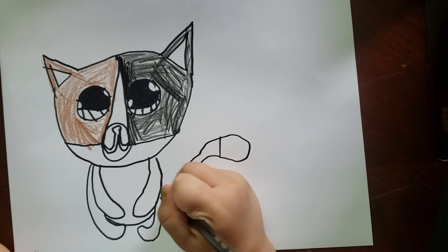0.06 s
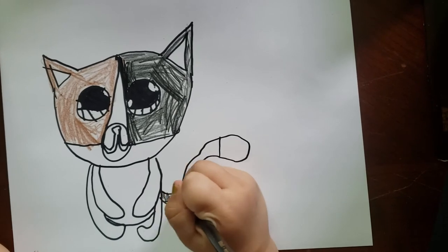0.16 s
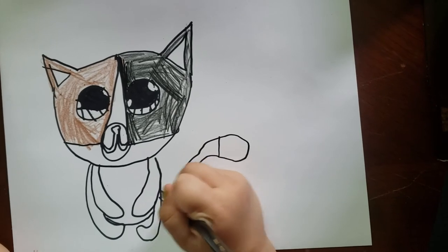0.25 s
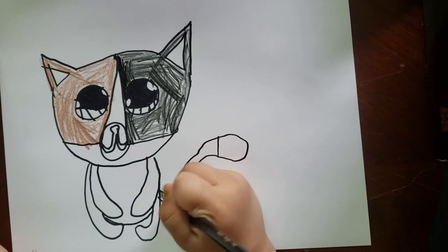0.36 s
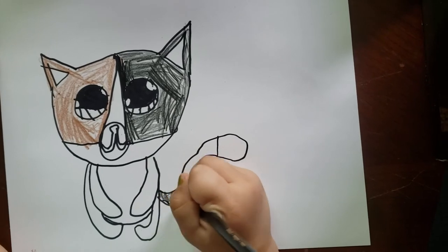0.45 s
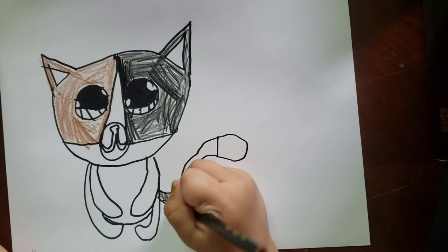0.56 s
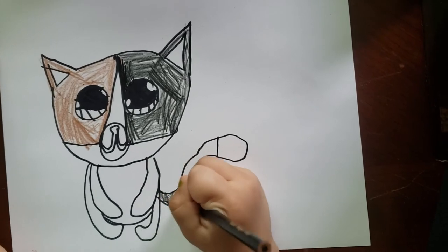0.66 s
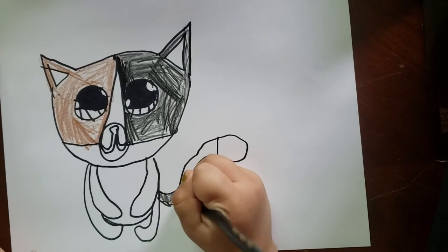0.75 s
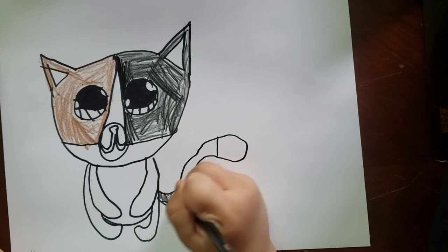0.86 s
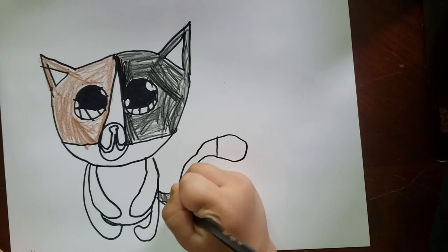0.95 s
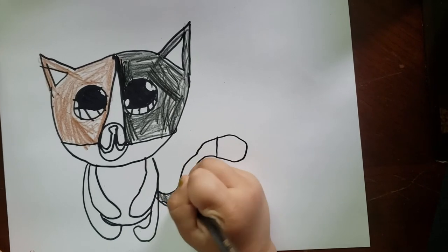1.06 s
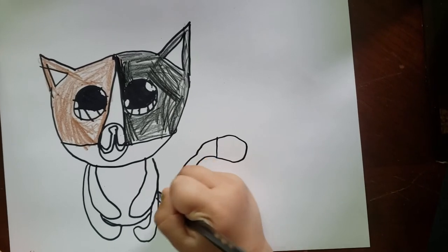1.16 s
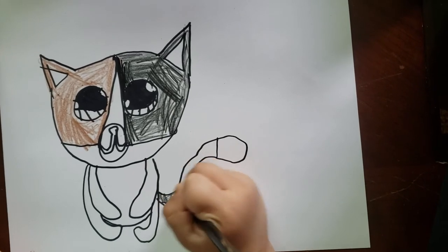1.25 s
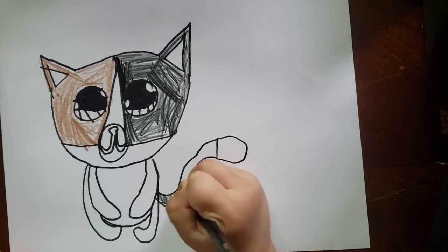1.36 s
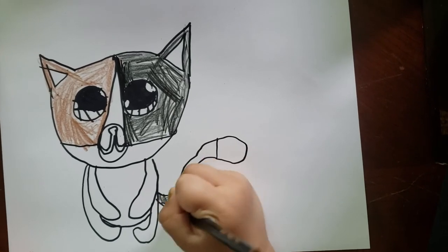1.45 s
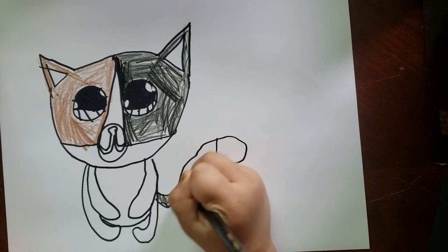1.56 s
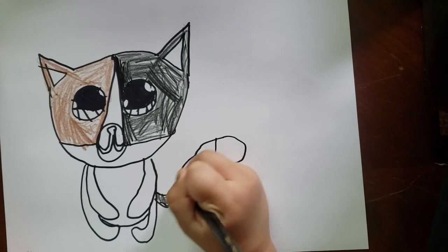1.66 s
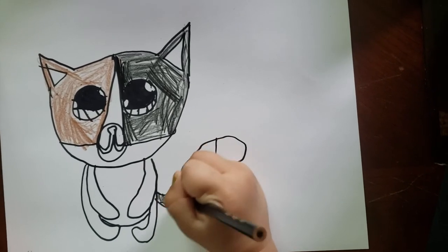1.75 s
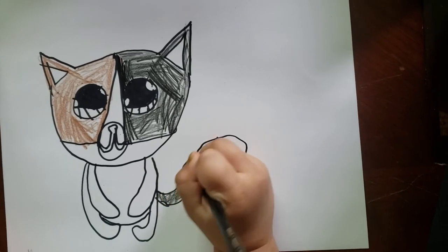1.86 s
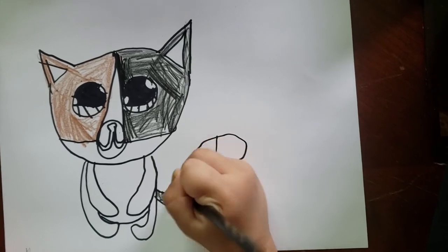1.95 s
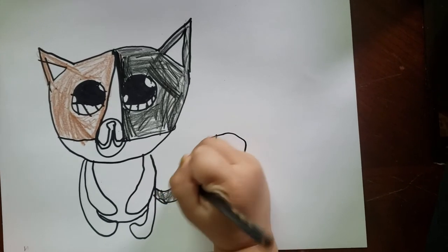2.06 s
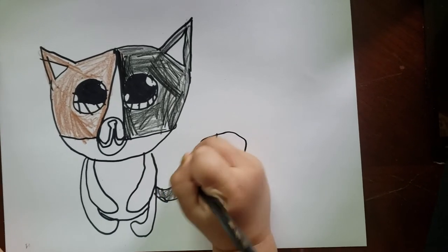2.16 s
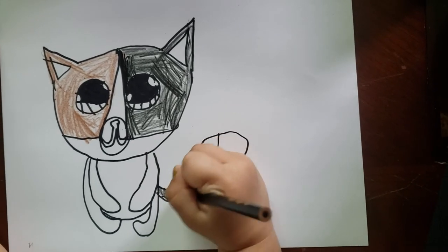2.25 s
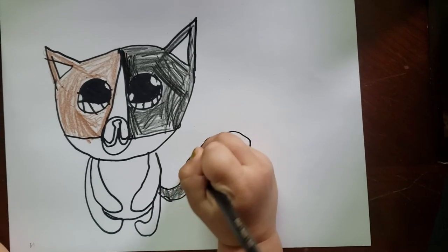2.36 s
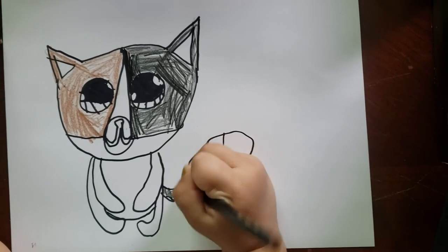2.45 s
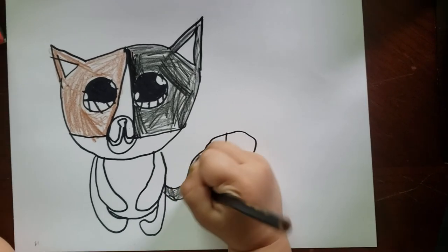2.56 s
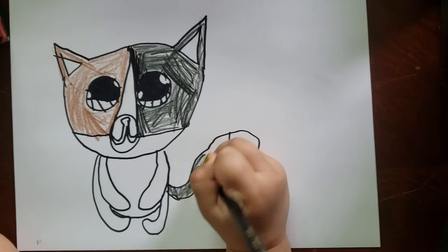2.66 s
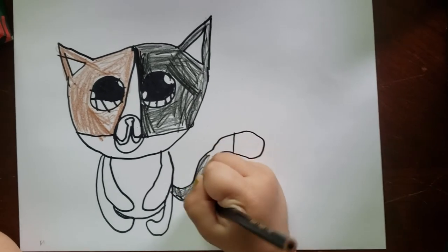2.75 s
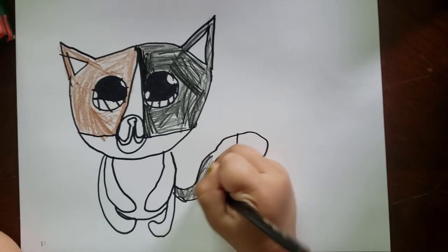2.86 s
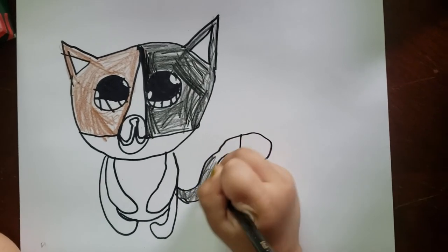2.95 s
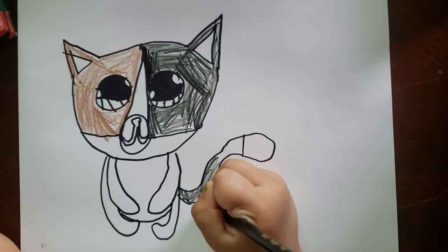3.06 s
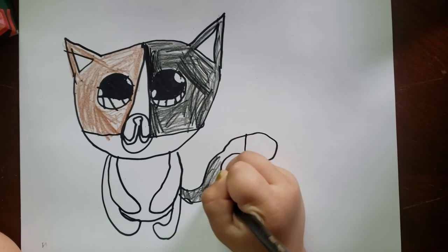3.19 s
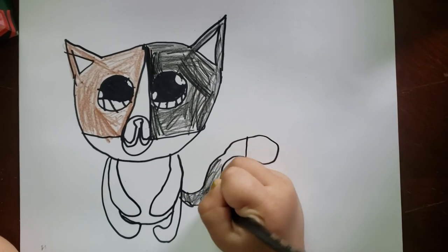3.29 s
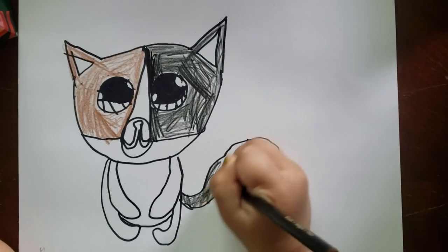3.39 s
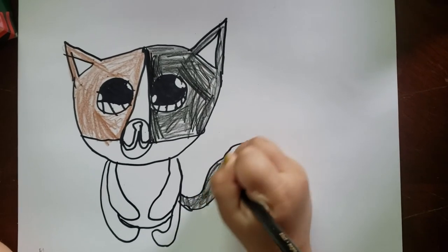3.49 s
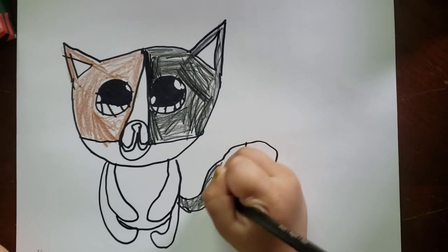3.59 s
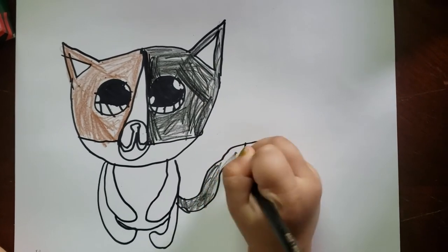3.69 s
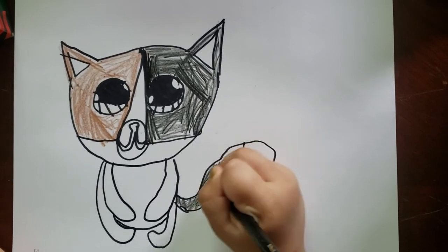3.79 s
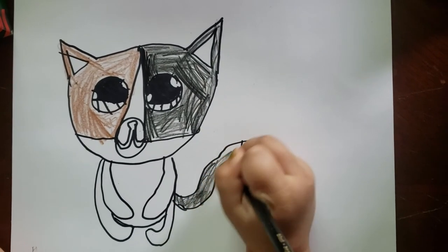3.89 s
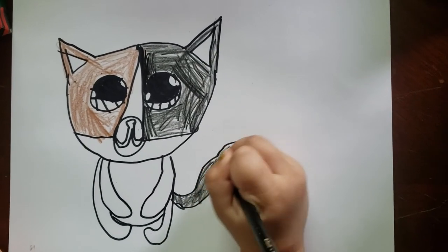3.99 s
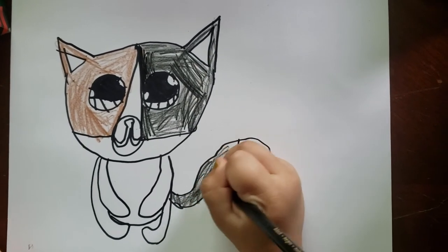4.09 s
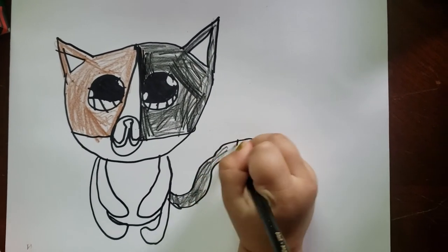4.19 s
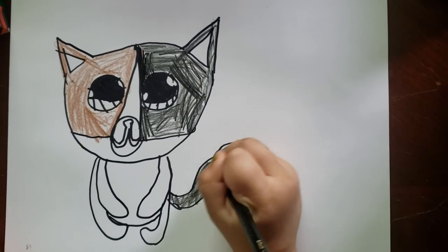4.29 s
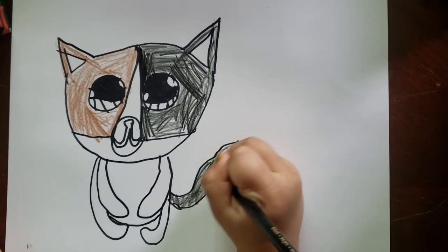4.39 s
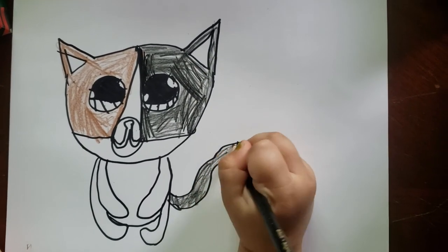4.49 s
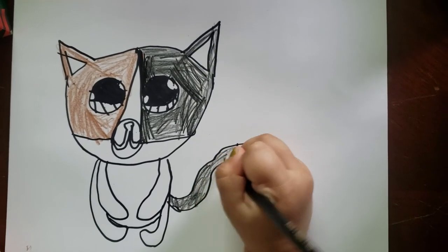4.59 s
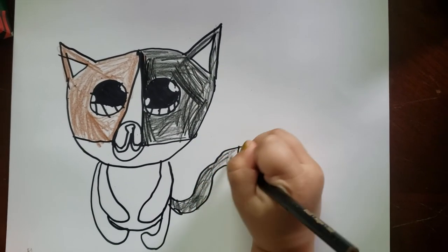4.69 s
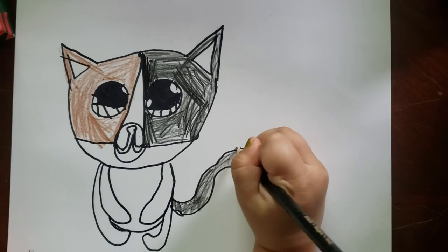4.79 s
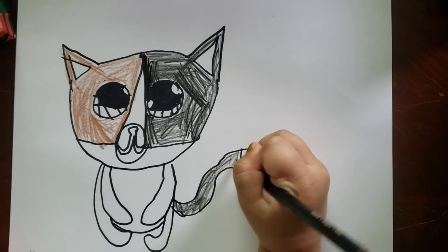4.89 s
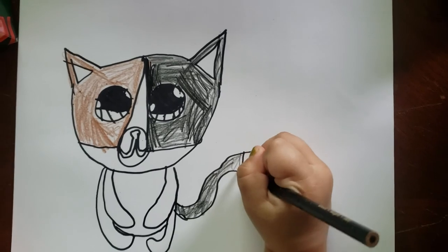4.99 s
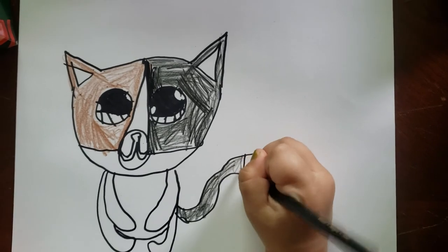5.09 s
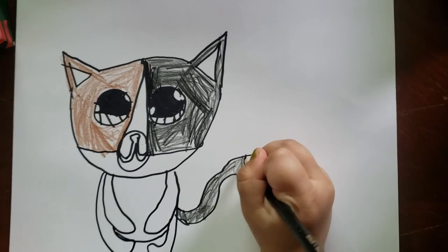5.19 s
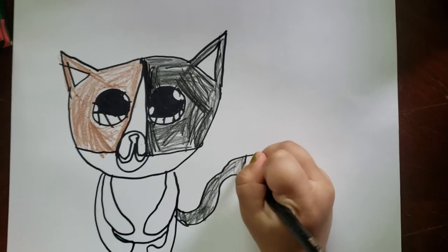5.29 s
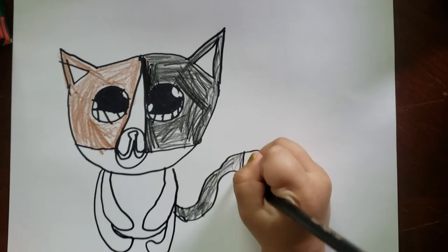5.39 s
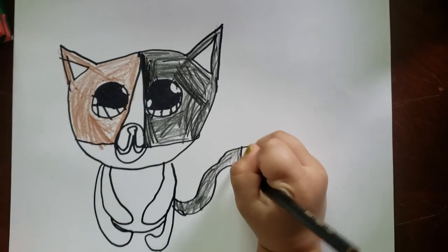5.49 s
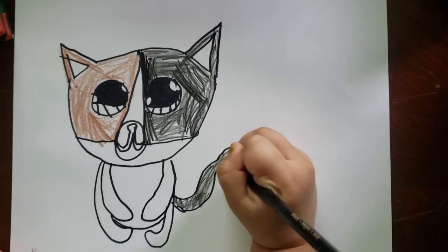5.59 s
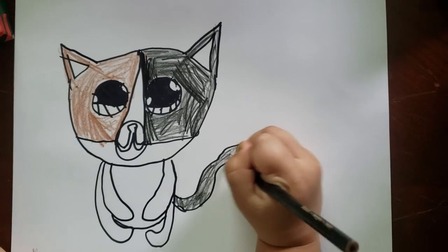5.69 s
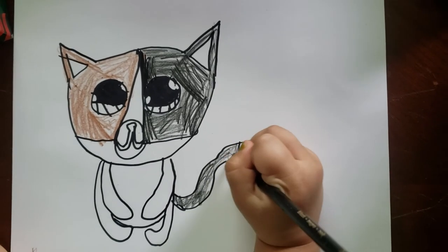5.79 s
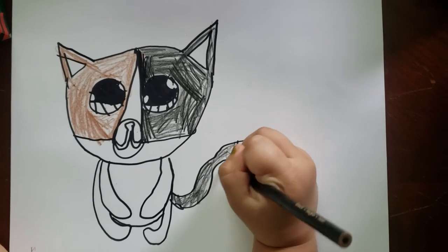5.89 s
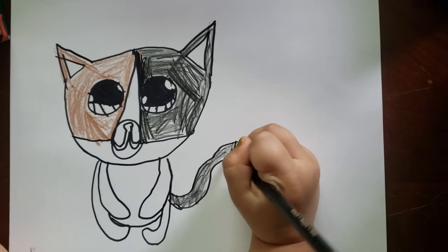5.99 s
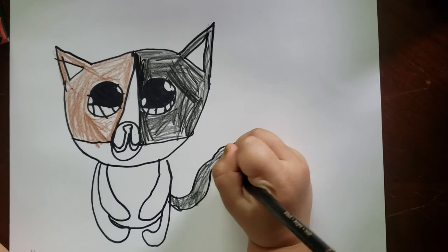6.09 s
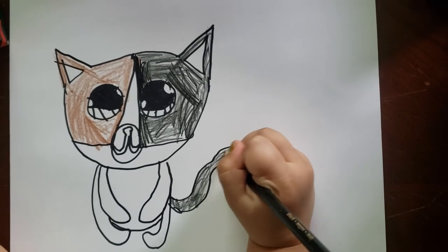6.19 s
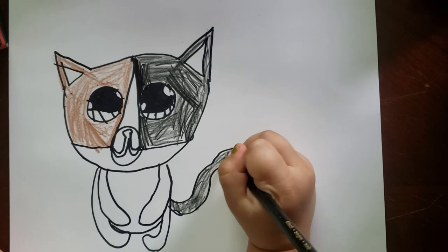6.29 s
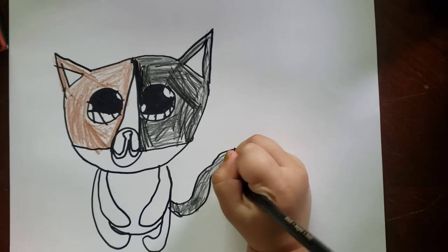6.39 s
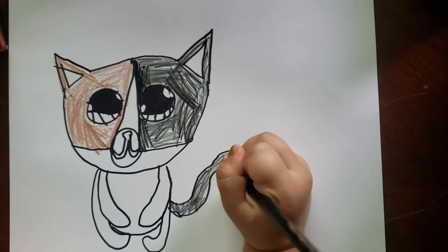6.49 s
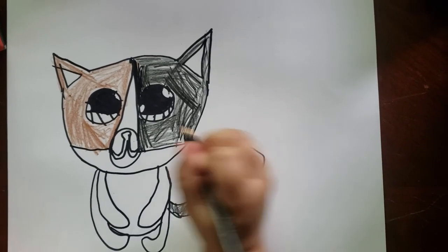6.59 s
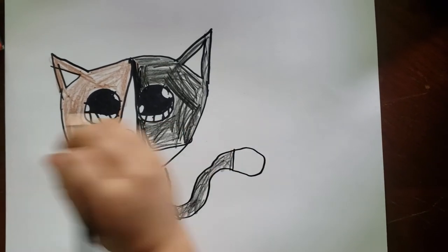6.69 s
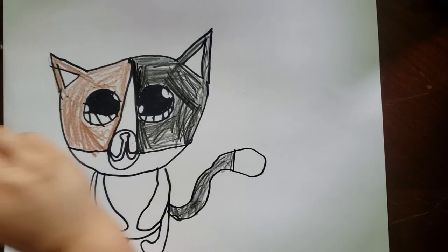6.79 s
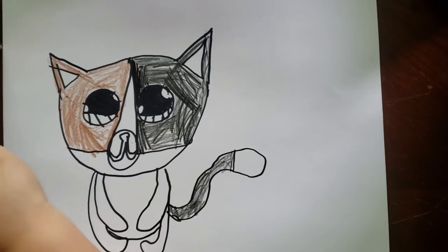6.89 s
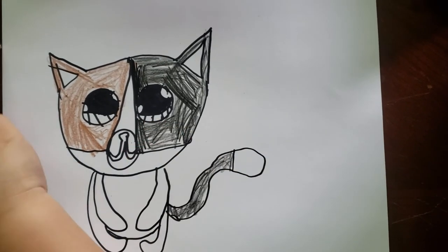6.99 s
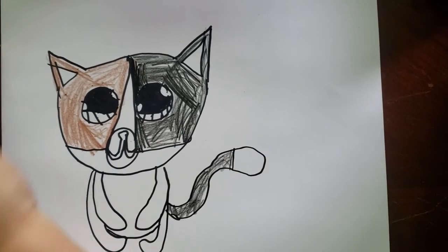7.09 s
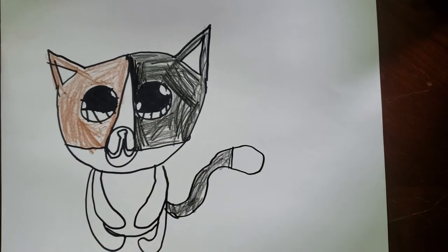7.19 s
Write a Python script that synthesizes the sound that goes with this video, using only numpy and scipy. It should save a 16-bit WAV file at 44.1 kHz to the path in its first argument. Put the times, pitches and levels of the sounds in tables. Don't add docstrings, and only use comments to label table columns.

```python
import sys
import numpy as np
from scipy import signal
from scipy.fft import rfft, irfft, next_fast_len
from scipy.io import wavfile
from scipy.ndimage import uniform_filter1d

SR = 44100
rng = np.random.default_rng(int(sys.argv[2]) if len(sys.argv) > 2 else 0)


def wav_out(sig):
    wavfile.write(sys.argv[1], SR, np.round(np.clip(np.atleast_2d(sig).T, -1, 1) * 32767).astype(np.int16))


def natural_amplitude(level_db):
    exponent = np.asarray(level_db, float) / 20
    return 10 ** exponent


N = 319725

# pitch in Hz, level in dB, time to fade by 60 dB in s.
TABLE_RINGS = [(203, -21.5, 0.3), (317, -7, 0.017), (366, -3.5, 0.012), (554, -4, 0.0071),
               (750, -11.5, 0.0029), (900, -20, 0.019)]


def curves(rows):
    s, *columns = np.transpose(rows)
    return [np.interp(np.arange(N) / SR, s, column) for column in columns]


def at_hz(points, hz):
    points = np.array(points)
    return np.interp(np.log(hz + 1), np.log(points[:, 0] + 1), points[:, 1])


def rms_one(x):
    return x / np.sqrt(np.mean(x ** 2) + 1e-20)


def drift(rate_hz):
    r = np.exp(-2 * np.pi * rate_hz / SR)
    noise = rng.standard_normal(N + SR)
    return rms_one(signal.lfilter([1], [1, -2 * r, r * r], noise)[SR:])


def band_pass(x, order, hz, kind):
    return signal.sosfilt(signal.butter(order, hz, kind, fs=SR, output="sos"), x)


def colour(pair, spectrum, side):
    size = next_fast_len(N)
    hz = np.arange(size // 2 + 1) * SR / size
    gain = natural_amplitude(at_hz(spectrum, hz) + at_hz(side, hz) * [[.5], [-.5]])
    return rms_one(irfft(rfft(pair, size) * gain, size)[:, :N])


def room(pair, near_db, tail_db=1):
    t = np.arange(SR // 2) / SR
    near, tail = rng.standard_normal((2, 2, len(t))) / np.sqrt(len(t))
    near = near * rms_one(natural_amplitude(-60 * t / 0.007)) * natural_amplitude(near_db)
    tail = band_pass(tail, 1, 1650, "low")
    tail_shape = natural_amplitude(-60 * t / 0.21) * (1 - np.exp(-t / 0.013))
    tail = tail * rms_one(tail_shape) * natural_amplitude(tail_db)
    return pair + signal.fftconvolve(pair, near + tail, axes=1)[:, :N]


def strike(force, modes):
    out = 0
    for hz, mode_db, t60 in modes:
        r, w = natural_amplitude(-60 / (t60 * SR)), 2 * np.pi * hz / SR
        ringing = signal.lfilter([0, np.sin(w)], [1, -2 * r * np.cos(w), r * r], force)
        out = out + natural_amplitude(mode_db + rng.normal(0, 0.26)) * ringing
    return out


def touches(rows, modes, crack_hz, contact_s, table_modes=TABLE_RINGS):
    bright, thuds = np.zeros((2, 2, N + SR))
    t = np.arange(SR // 4) / SR
    push = np.sin(np.pi * np.clip(t / contact_s, 0, 1)) ** 2 / (contact_s * SR) * 2
    for s, crack_db, t60, thud_db, pan_db in rows:
        grain_sizes = natural_amplitude(-0.5 * np.minimum(rng.exponential(1, len(t)), 5))
        rough = rms_one(rng.standard_normal((3, len(t))) * grain_sizes)
        rough = 0.26 * rough[0] + 0.2 * rough[1:]
        rise = 1 - np.exp(-t / (0.046 * t60))
        force = rough * natural_amplitude(crack_db - 60 * t / t60) * rise + 1e-18
        crack = band_pass(force + 0.26 * strike(force, modes), 3, [crack_hz, 16500], "band")
        crack[0] = np.roll(crack[0], 17)
        at = round(s * SR)
        bright[:, at:at + len(t)] += crack * natural_amplitude(pan_db * np.array([[.5], [-.5]]))
        thuds[:, at:at + len(t)] += strike(natural_amplitude(thud_db) * push + 1e-18, table_modes)
    return bright[:, :N], thuds[:, :N]


def crayon():
    # time of top speed in seconds, scratch level in dB,
    # speeding up in seconds, slowing down in seconds. First patch, quick even hatching:
    first_patch = [(0.068, -52.5, 0.073, 0.069), (0.203, -60.5, 0.083, 0.11), (0.381, -57.5, 0.044, 0.077),
                   (0.526, -58.5, 0.084, 0.075), (0.648, -60.5, 0.062, 0.064), (0.774, -67, 0.1, 0.122),
                   (0.875, -63, 0.069, 0.055), (0.995, -56.5, 0.079, 0.11), (1.257, -55.5, 0.082, 0.091),
                   (1.37, -54, 0.055, 0.1), (1.509, -56.5, 0.084, 0.1), (1.672, -55, 0.095, 0.099),
                   (1.79, -53, 0.059, 0.091), (1.933, -52, 0.085, 0.076), (2.028, -52, 0.034, 0.13),
                   (2.186, -53.5, 0.075, 0.062), (2.285, -54, 0.055, 0.12), (2.431, -52.5, 0.075, 0.081),
                   (2.53, -55, 0.036, 0.15), (2.732, -56.5, 0.13, 0.059), (2.812, -54, 0.054, 0.14),
                   (2.987, -54, 0.1, 0.071), (3.11, -54.5, 0.086, 0.1), (3.25, -61, 0.08, 0.081),
                   (3.363, -62, 0.045, 0.07)]
    second_patch = [(3.497, -52, 0.07, 0.12), (3.637, -55.5, 0.061, 0.084), (3.771, -52, 0.082, 0.069),
                    (3.87, -50.5, 0.048, 0.088), (3.99, -53.5, 0.063, 0.098), (4.122, -54.5, 0.08, 0.093),
                    (4.285, -55, 0.095, 0.066), (4.415, -52.5, 0.12, 0.054), (4.547, -58, 0.09, 0.1),
                    (4.668, -61.5, 0.057, 0.11), (4.832, -60.5, 0.14, 0.083), (5.022, -62.5, 0.13, 0.11),
                    (5.209, -61.5, 0.012, 0.22), (5.443, -63, 0.102, 0.11), (5.691, -65, 0.089, 0.16),
                    (5.817, -59.5, 0.054, 0.071), (5.944, -58.5, 0.091, 0.064),
                    (6.049, -59.5, 0.064, 0.076), (6.194, -61.5, 0.11, 0.054), (6.298, -71.5, 0.1, 0.088),
                    (6.489, -69, 0.126, 0.091), (6.657, -64, 0.11, 0.1), (6.842, -53, 0.056, 0.044)]
    further_strokes = [
        (.13, -71, .04, .05),
        (1.12, -55.5, 0.074, 0.066),
        (4.745, -69, 0.055, 0.052),
        (5.605, -62.5, 0.034, 0.13),
        (6.78, -63.5, 0.1, .05),
        (6.35, -78, .06, .05),
    ]
    # start in seconds, scratch level in dB.
    bites = [
        (2.006, -57),
        (2.512, -63),
        (2.782, -51.5),
        (3.062, -67.5),
        (3.337, -100),
        (3.845, -64),
        (5.198, -94),
        (5.588, -88),
    ]
    # time in seconds, weight as table-borne level of a mean stroke in dB,
    # uprightness as extra top in dB, ring of the sheet in dB.
    hand = [
        (0, -74, 7, 8),
        (1.0, -73, 2.5, 4.5),
        (2.5, -68, 4, 0.5),
        (3.9, -68, 0.5, 1.5),
        (4.6, -69, 0.5, 3),
        (5.8, -74.5, 3, 7),
        (6.9, -66, 2.5, -6.5),
    ]
    # frequency in Hz, level in dB per Hz.
    scratch_spectrum = [(1500, -2), (2000, -5.5), (2430, -14.5), (3000, -5), (3400, -11), (3820, -11.5),
                        (4590, -18), (5500, -10), (6360, -5.5), (7350, -0.5), (8250, -3.5), (9630, -3),
                        (11200, 0.5), (12500, 6), (13400, 6.5), (14400, 2)]
    # frequency in Hz, left minus right in dB.
    scratch_tilt = [(2000, 2.5), (3300, -6), (5500, -18), (7500, -13), (9100, -9), (12500, -3),
                    (15000, -10.5)]
    # frequency in Hz, width in Hz, swing in dB.
    singing_patches = [(5430, 570, 2), (6430, 300, 2), (7140, 430, 2), (9600, 350, 2.5), (11700, 630, 2),
                       (12900, 720, 2), (14400, 800, 2)]

    t, scratch, borne = np.arange(N) / SR, np.zeros(N), np.zeros(N)
    for s, level_db, rise, fall in list(first_patch) + list(second_patch) + list(further_strokes):
        phase = np.clip(np.where(t < s, (t - s) / rise, (t - s) / fall), -1, 1)
        speed = np.cos(np.pi / 2 * phase) ** 2.63
        scratch += speed * natural_amplitude(level_db)
        borne += speed * natural_amplitude(level_db + 55)
    for s, level_db in bites:
        since = np.maximum(t - s, 0)
        scratch += natural_amplitude(level_db) * (1 - np.exp(-since / 0.011)) * np.exp(-(since / 0.045) ** 2)

    caught = rng.random(N) < 9000 / SR
    sizes = natural_amplitude(2.0 * np.minimum(rng.exponential(1, N), 5))
    grains = caught * sizes * rng.choice([-1, 1], N)
    grains = grains * natural_amplitude(1.34 * drift(43))
    spread = np.array([np.roll(grains, 5000), np.roll(grains, 9000)])
    tip = np.array([grains, np.roll(grains, -11)])
    pair = colour(tip + 2.6 * spread, scratch_spectrum, scratch_tilt)

    borne_db, upright_db, ring_db = curves(hand)
    low = band_pass(pair, 3, [1800, 5200], "band")
    ring = signal.lfilter(*signal.iirpeak(2965, 2965 / 300, fs=SR), rms_one(low)) * np.std(low)
    low = low + ring * (natural_amplitude(ring_db) - 1)

    high = band_pass(pair, 3, 5200, "high")
    top = band_pass(high, 4, 9800, "high")
    high = high + top * (natural_amplitude(upright_db + 1.2 * drift(36.0)) - 1)
    for hz, width_hz, swing_db in singing_patches:
        patch = signal.lfilter(*signal.iirpeak(hz, hz / width_hz, fs=SR), high)
        high = high + patch * (natural_amplitude(swing_db * drift(6.2)) - 1)
    return natural_amplitude(-2.0) * scratch * rms_one(high) + natural_amplitude(borne_db) * borne * rms_one(low)


def diffuse():
    # frequency in Hz, likeness of left and right from -1 to 1 (no unit).
    likeness = [(25, 1), (60, 1), (110, 0.98), (200, 1), (380, 0.77), (700, 0.025), (1290, 0.48),
                (2380, -0.069), (4400, -0.078), (8120, 0.02), (15000, 0.15)]
    size = next_fast_len(N)
    alike = np.clip(at_hz(likeness, np.arange(size // 2 + 1) * SR / size), -1, 1)
    mid, side = rfft(rng.standard_normal((2, size)))
    return irfft(np.sqrt(1 + alike) * mid + np.sqrt(1 - alike) * side * [[1], [-1]], size)[:, :N]


def traffic():
    # frequency in Hz, level in dB per Hz.
    rumble = [(12, -37), (20, -11), (43, -25), (75, 0.5), (97, -1.5), (123, 2), (150, -13.5), (170, -1),
              (220, -36), (370, -120)]
    # frequency in Hz, level in dB per Hz.
    drone = [(82, -10.5), (140, -13.5), (151, -22.5), (183, 0.5), (236, -1), (259, -3.5), (420, -16.5),
             (550, -17.5), (920, -120)]
    # frequency in Hz, level in dB per Hz.
    wash = [(220, -1), (380, -7), (468, -3), (568, -6.5), (646, -2), (921, -5), (1130, -4), (1470, -10),
            (1820, -8.5), (2500, -34), (2600, -57), (3380, -28.5), (5720, -120)]
    # frequency in Hz, left minus right in dB.
    traffic_tilt = [(60, -4.5), (110, 2.5), (200, 0), (380, 7), (700, 0), (1290, 2), (2380, 12), (4400, -3),
                    (8120, -8.5), (15000, -3.0)]
    # time in seconds, tyre wash in dB.
    nearness = [(0.0, -100.5), (0.65, -81), (1.29, -77.5), (1.53, -80.5), (2.81, -70.5), (3.43, -71.5),
                (3.75, -69.5), (4.02, -66), (4.34, -64.5), (5.65, -65.5), (5.81, -66), (7.05, -65)]
    # level at closest in dB, share of the swell (no unit), waver in dB.
    layers = [
        (-55.5, 0.31, -0.15),
        (-60.5, 0.36, 2.38),
        (-60, 1.33, 1.14),
    ]
    out, (near_db,) = 0, curves(nearness)
    for (top_db, share, waver_db), spectrum in zip(layers, (rumble, drone, wash)):
        level_db = top_db + share * (near_db - near_db.max()) + waver_db * drift(4.7)
        out = out + natural_amplitude(level_db) * colour(diffuse(), spectrum, traffic_tilt)
    return np.array([out[0], np.roll(out[1], 9)])


def microphone_hiss():
    # frequency in Hz, level in dB per Hz.
    hiss_spectrum = [(240, -35), (400, -13.5), (800, -4), (1850, -10.5), (2800, -12), (4500, -16),
                     (5850, -20), (6500, -5.5), (7000, -20.5), (7500, -16), (9000, -33), (10600, -18),
                     (12500, -10), (15000, -12.5)]
    noise = rng.standard_normal((2, N))
    return natural_amplitude(-74) * colour(noise, hiss_spectrum, [(1000, -1.5), (10000, -4.0)])


def sliding_thing():
    # start in seconds, crack in dB, fade by 60 dB in seconds, thud in dB, left minus right in dB.
    slides = [
        (.018, -61.5, 0.15, -90, 0),
        (.05, -66, 0.082, -87, 0),
        (1.012, -54, 0.077, -90, 0),
        (1.035, -54, 0.067, -90, 0),
        (1.056, -49, 0.07, -90, 0),
    ]
    # pitch in Hz, level in dB, time to fade by 60 dB in seconds.
    slide_rings = [(876, 2.9, 0.0084), (2240, 2.2, 0.0062)]
    return touches(slides, slide_rings, 660, .001)


def clicking_thing():
    # start in seconds, crack in dB, fade by 60 dB in seconds, thud in dB, left minus right in dB.
    clicks = [(1.0052, -47, 0.0093, -95, -14), (1.0064, -47, 0.0047, -95, -12),
              (1.0072, -40, 0.007, -95, -13), (1.0086, -36.5, 0.006, -46, -11),
              (1.0100, -41.5, 0.0052, -95, -19), (1.0155, -49, 0.025, -74, -9),
              (1.0228, -47, .004, -95, -17), (1.022, -55, 0.05, -77, -13), (1.027, -56, .008, -95, -12),
              (1.033, -55, 0.1, -61, -8), (1.048, -63, .05, -95, -10), (1.06, -71, .05, -95, -10)]
    # pitch in Hz, level in dB, time to fade by 60 dB in seconds.
    click_rings = [(2750, 11, 0.0012), (5070, -11, 0.004), (11100, 4, 0.0043), (11100, 9, 0.0055),
                   (13000, 8, 0.0026), (14100, 9, 0.0033)]
    # start in seconds, crack in dB, fade by 60 dB in seconds, thud in dB, left minus right in dB.
    ticks = [
        (1.0742, -52, .003, -95, -11),
        (1.0750, -45, 0.002, -95, -11),
        (1.0764, -40, 0.0025, -95, -17),
        (1.0782, -44, 0.002, -95, -15),
        (1.0807, -46, 0.0022, -73, -12),
        (1.0829, -46, 0.0028, -95, -9),
    ]
    # pitch in Hz, level in dB, time to fade by 60 dB in seconds.
    tick_rings = [(7500, -7, .002), (11100, 9, 0.004), (13500, 1, 0.002)]
    click, click_thud = touches(clicks, click_rings, 3200, 0.0025)
    tick, tick_thud = touches(ticks, tick_rings, 6500, .001)
    return click + tick, click_thud + tick_thud


def hand_bumps():
    # start in seconds, crack in dB, fade by 60 dB in seconds, thud in dB, left minus right in dB.
    bumps = [
        (1.3675, -90, .01, -36, 1),
        (1.3838, -90, .01, -40, 1),
        (1.41, -101, .01, -48, 1),
        (1.715, -68, 0.077, -84, 2),
        (5.2005, -50, 0.026, -64, 0.82),
        (5.208, -69, 0.016, -72, 1),
    ]
    # pitch in Hz, level in dB, time to fade by 60 dB in seconds.
    bump_rings = [(1150, 7, .055), (1380, -2, .03), (3300, -16, .008)]
    # pitch in Hz, level in dB, time to fade by 60 dB in seconds.
    damped_table = [(152, -18, 0.027), (222, -3.5, 0.066), (290, -10, 0.023), (454, -7, 0.037),
                    (560, -17, .012), (720, -20, .01)]
    return touches(bumps, bump_rings, 660, 0.0027, damped_table)


def dropped_crayon():
    # start in seconds, crack in dB, fade by 60 dB in seconds, thud in dB, left minus right in dB.
    tip_hits = [
        (7.1072, -5, 0.0068, -31, -2.5),
        (7.1082, -6, 0.0041, -36.5, 2.5),
        (7.110, -16, 0.0067, -64, -6),
    ]
    # pitch in Hz, level in dB, time to fade by 60 dB in seconds.
    tip_rings = [(1960, -17, 0.0036), (2570, -2.5, 0.0069), (4030, 0, 0.0036), (6600, 0, 0.0033),
                 (9130, 6, 0.0066), (11600, 2, .005), (12800, 0, 0.0019)]
    # start in seconds, crack in dB, fade by 60 dB in seconds, thud in dB,
    # left minus right in dB.
    drop_hits = [(7.0945, -61, 0.012, -74, -9), (7.1111, -11, 0.0041, -22, -15),
                 (7.1131, -12, 0.0065, -46, 3), (7.1153, -29, 0.0074, -60, 2),
                 (7.1176, -26, 0.0074, -58, -1), (7.1198, -14, 0.016, -60, -5),
                 (7.1222, -16, 0.012, -48, 7), (7.1244, -22, 0.0076, -33, -6),
                 (7.1270, -24.5, .015, -56, -8), (7.1325, -30, 0.03, -54, -7), (7.138, -31, 0.1, -41, 2)]
    # pitch in Hz, level against the crack in dB, time to fade by 60 dB in seconds.
    drop_rings = [(1960, -23, 0.012), (2160, -9, 0.012), (2300, -1, 0.01), (2820, -6, 0.0097),
                  (3880, -2, 0.0068), (4350, -16, 0.013), (4735, -12, 0.011), (4950, -18, 0.008),
                  (6300, -4, 0.015), (6630, -6, 0.013), (7200, 4, 0.0068), (9110, -5, 0.0045),
                  (11200, -5, 0.0052), (12800, 0, 0.0044)]
    # start in seconds, crack in dB, fade by 60 dB in seconds, thud in dB,
    # left minus right in dB.
    bounce_hits = [
        (7.1904, -8, 0.0098, -31, 11),
        (7.1924, -5, 0.0032, -51, -20),
        (7.1934, -10, 0.0043, -42, -7),
        (7.1955, -16, 0.016, -62, -20),
        (7.2045, -40, 0.01, -37, -24),
        (7.2092, -27, 0.014, -54, -4),
        (7.216, -26, 0.072, -37, 7),
        (7.2399, -9, 0.0036, -37, -27.5),
        (7.2413, -16, 0.0086, -64, 8),
        (7.2428, -15.5, 0.0091, -62, 3),
    ]
    # pitch in Hz, level against the crack in dB, time to fade by 60 dB in seconds.
    bounce_rings = [(1770, -12, 0.0088), (2100, -12.5, 0.0093), (2500, -14, 0.01), (2850, -16, 0.008),
                    (3410, -15, 0.035), (4130, -16, 0.0071), (5200, -22, .01), (6000, -41, 0.044),
                    (6260, -10.5, 0.031), (7670, -11.5, 0.0061), (9630, -12, 0.0074),
                    (12900, -13.5, 0.0041), (12960, -14.5, .012)]
    tip, tip_thud = touches(tip_hits, tip_rings, 1700, .0007)
    body, body_thud = touches(drop_hits, drop_rings, 1500, .0007)
    bounce, bounce_thud = touches(bounce_hits, bounce_rings, 1600, .0007)
    return tip + body + bounce, tip_thud + body_thud + bounce_thud


def scene():
    # frequency in Hz, left minus right in dB.
    near_tilt = [(700, 4), (1500, 7.5), (3000, 5.5), (5000, -0.5), (9000, -3), (13000, 0)]
    # Hz, dB
    hard_tone = [(700, 10), (1300, -8), (2000, -3.5), (3300, 1.0), (4800, 5.5), (5600, -1.5),
                 (6200, 3.5), (7500, -2), (11000, 1.5), (14000, 3)]
    strokes = room(crayon(), near_db=-20)
    slide, slide_thud = sliding_thing()
    click, click_thud = clicking_thing()
    bump, bump_thud = hand_bumps()
    drop, drop_thud = dropped_crayon()

    hard = click + drop
    hard = room(colour(hard, hard_tone, near_tilt) * np.std(hard), -5.5)
    soft = (natural_amplitude(0.5) * slide + natural_amplitude(3.0) * bump) * natural_amplitude([[2.5], [-2.5]])
    soft = room(soft, -5.5, tail_db=-3)

    thuds = click_thud + drop_thud + slide_thud + bump_thud
    thuds = band_pass(thuds, 2, 130, "high")
    boom = room(thuds, near_db=-31.0) - thuds
    middle = boom.mean(axis=0)
    boom = middle + 0.55 * (boom - middle)
    return strokes + hard + soft + thuds * natural_amplitude([[.8], [-.8]]) + 0.37 * boom + traffic()


def thin_faint_bands(pair):
    # frequency in Hz, share of the time a band drops out (no unit).
    dropouts = [(2000, 0), (2500, .06), (3000, .02), (3600, .14), (4500, .3), (5300, .24), (5900, .24),
                (6200, .02), (7900, .01), (8500, .18), (10300, .2), (11000, 0)]
    hz, _, cells = signal.stft(pair, SR, nperseg=1024)
    chance = rng.standard_normal(cells.shape[1:])
    chance = uniform_filter1d(uniform_filter1d(chance, size=5, axis=0), size=5, axis=1)
    rank = np.argsort(np.argsort(chance, axis=1), axis=1) / chance.shape[1]
    faint = np.abs(cells[:, hz > 2000]).mean(axis=(0, 1)) < natural_amplitude(-85)
    gain = np.where((rank < at_hz(dropouts, hz)[:, None]) & faint, natural_amplitude(-22), 1)
    return signal.istft(cells * gain, SR, nperseg=1024)[1][:, :N]


def band_limit(x):
    return signal.sosfilt(signal.butter(12, 15990, fs=SR, output="sos"), x)


def record(dry):
    cutoff_hz = 14810
    low_pass = signal.cheby2(20, 36, cutoff_hz, fs=SR, output="sos")
    mix = signal.sosfilt(low_pass, thin_faint_bands(dry + microphone_hiss()))
    top_band = signal.cheby2(8, 50, [cutoff_hz - 300, 16300], "band", fs=SR, output="sos")
    top = signal.sosfilt(top_band, dry)
    loud = uniform_filter1d(np.abs(top).mean(axis=0), size=120) / natural_amplitude(-57)
    mix = mix + natural_amplitude(-30) * top * loud ** 4 / (1 + loud ** 4)
    return band_limit(mix)


dry = scene()
out = record(dry)
wav_out(out)
```